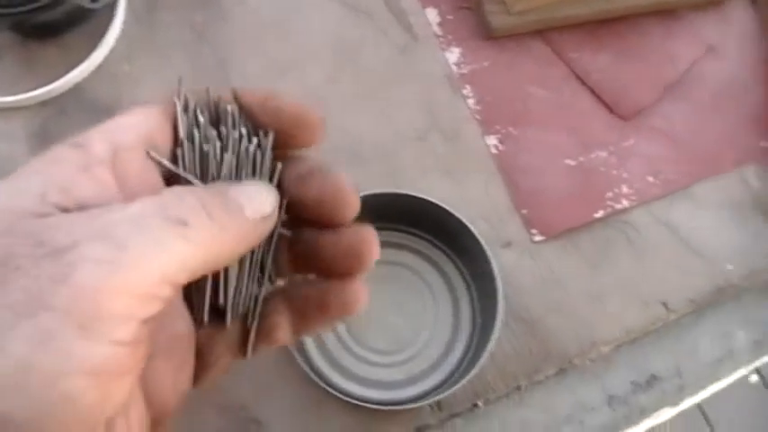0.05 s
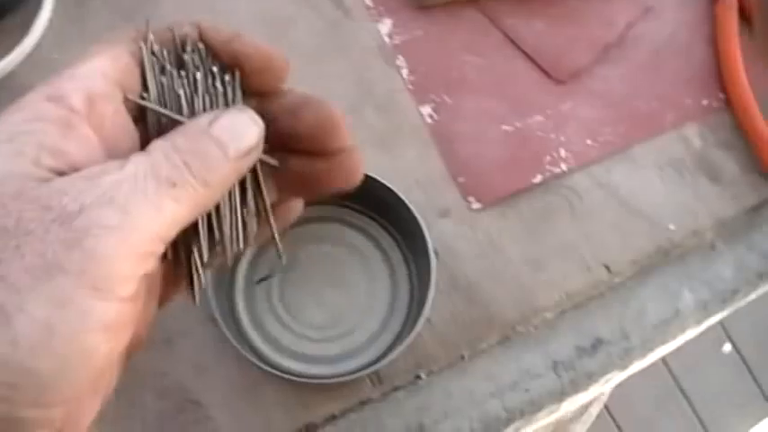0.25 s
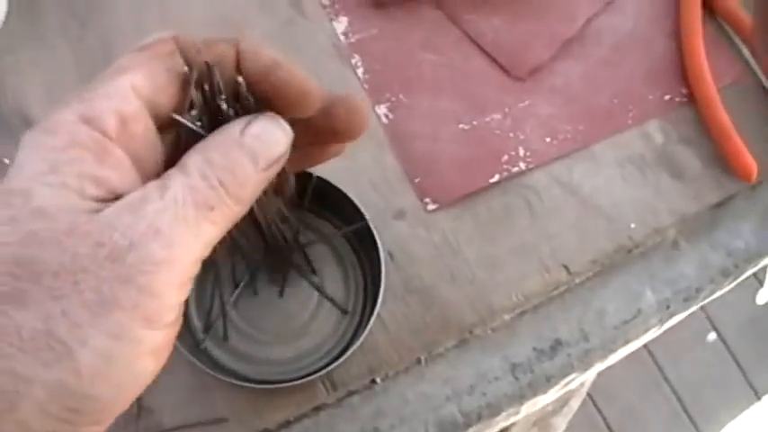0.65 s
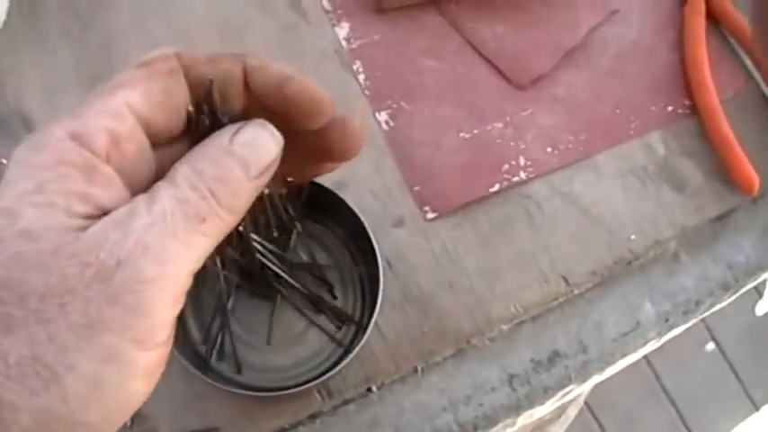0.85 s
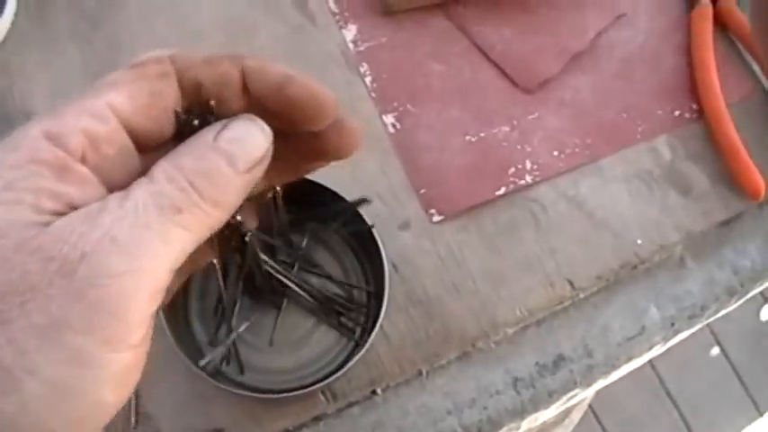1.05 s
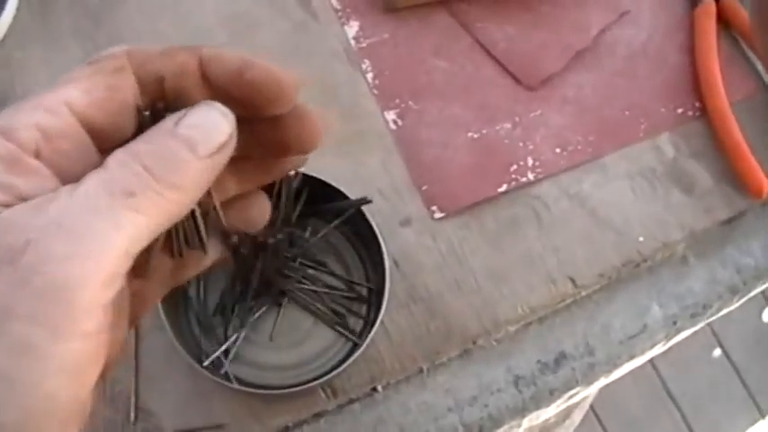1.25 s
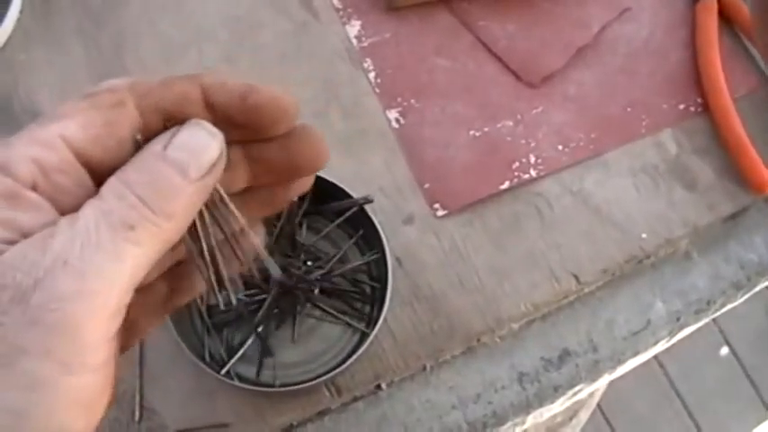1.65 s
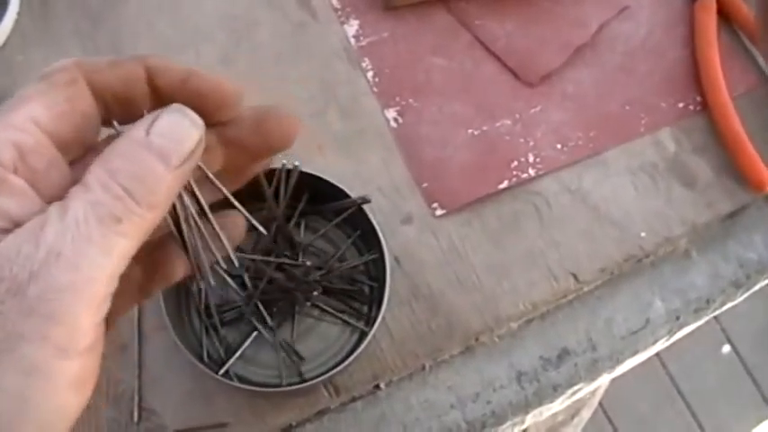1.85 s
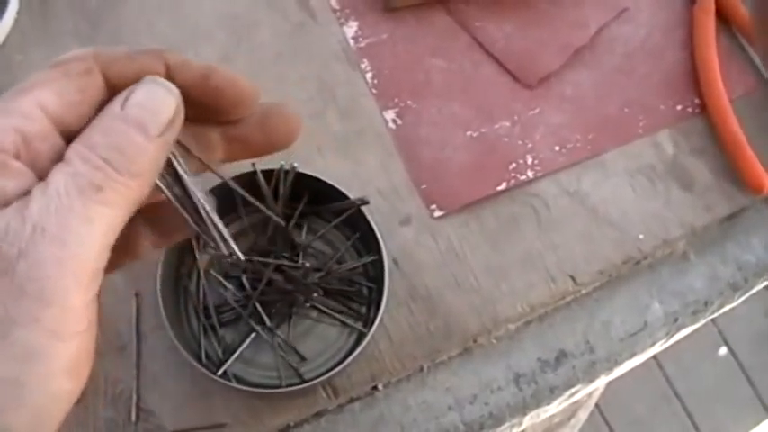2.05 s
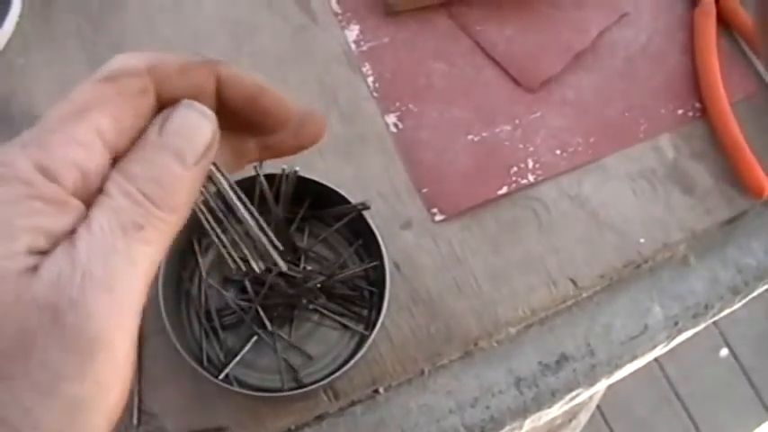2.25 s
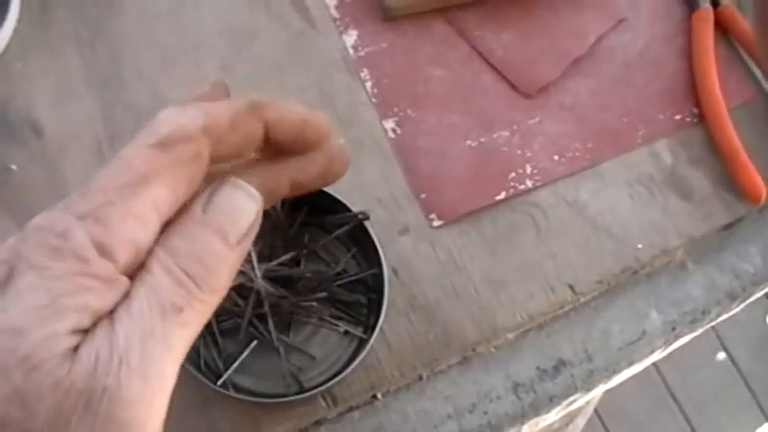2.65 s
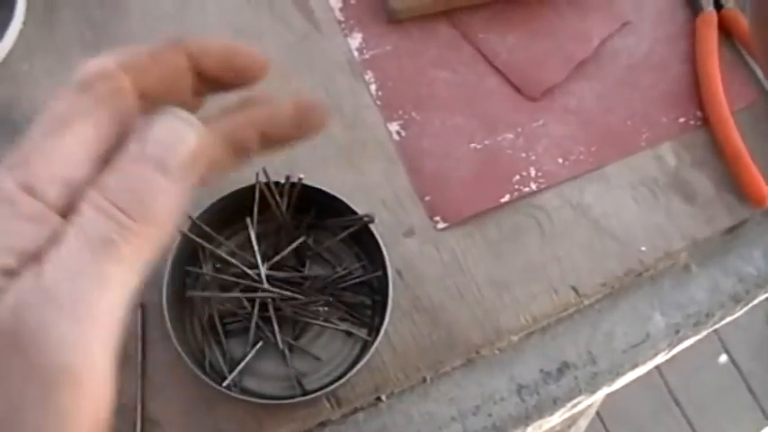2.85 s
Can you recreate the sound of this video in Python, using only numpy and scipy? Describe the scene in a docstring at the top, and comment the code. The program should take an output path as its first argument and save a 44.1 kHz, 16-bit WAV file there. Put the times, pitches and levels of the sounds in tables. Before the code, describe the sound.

Wire pieces clatter into a metal can, the bright clinks dulling as it fills.

```python
"""Outdoors, a far bird whistles over a low murmur of air while short iron wires shift in a hand.
From a quarter of a second they drop, a few at a time, into a shallow tin can on a wooden bench.
Each impact excites the modes of wire and can; heavy ones also thud the bench, and the loudest overload
the close microphone. The growing pile damps the can, so its clear ring gives way to a dry clatter.
The last wires settle, and near three seconds the bird calls again."""
import sys
import numpy as np
from scipy import signal
from scipy.fft import rfft, irfft
from scipy.io import wavfile
from scipy.ndimage import uniform_filter1d

SR = 44100
rng = np.random.default_rng(int(sys.argv[2]) if len(sys.argv) > 2 else 0)


def inscribe(sig):
    """Save sig as 16-bit PCM at rate SR to the path in sys.argv[1].

    A 1-D sig is mono; a 2-D sig holds one channel per row.
    Samples are clipped to [-1, 1] before scaling.
    """
    pcm = np.round(np.clip(np.atleast_2d(sig).T, -1, 1) * 32767)
    wavfile.write(sys.argv[1], SR, pcm.astype(np.int16))


N = 132300
OPPOSED = np.array([[1], [-1]])  # opposite signs in the left and right channels


def from_db(db):
    """Amplitude grows tenfold for every 20 dB."""
    return 10 ** (np.asarray(db) / 20)


def rms_one(x):
    """Normalisation: the signal is scaled to unit mean power."""
    return x / np.sqrt(np.mean(x ** 2) + 1e-20)


def level_at(spectrum, hz):
    """A spectral envelope is interpolated in dB against log frequency."""
    points_hz, db = np.transpose(spectrum)
    return np.interp(np.log(hz), np.log(points_hz), db)


def highpass(x, hz, order=2):
    """A Butterworth filter attenuates what lies below its cutoff."""
    return signal.sosfilt(signal.butter(order, hz, "high", fs=SR, output="sos"), x)


def ring(times, heights, hz, t60):
    """A mode is a damped oscillator: each impulse starts a decaying sinusoid."""
    impulses = np.bincount(np.clip((times * SR).astype(int), 0, N - 1), heights, N)
    radius = from_db(-60 / (t60 * SR))
    angle = 2 * np.pi * min(hz, SR / 2.2) / SR
    return signal.lfilter([0, np.sin(angle)], [1, -2 * radius * np.cos(angle), radius ** 2], impulses + 1e-18)


def coupling(times, spread_db):
    """Mode shape: each point of contact meets a mode with its own sign and strength."""
    sign, strength = rng.standard_normal((len(times), 2)).T
    return np.sign(sign) * from_db(spread_db * strength)


def placed(x, spread_db=1):
    """Directivity: each mode radiates a little more to one side."""
    return x * from_db(spread_db * rng.normal() * OPPOSED)


def force(levels, hz, body_hz=2200, treble_hz=10000):
    """An impact's spectrum is flat up to body_hz, then slopes through its treble level at treble_hz."""
    body, treble = levels
    share = np.clip(np.log(hz / body_hz) / np.log(treble_hz / body_hz), 0, 1.2)
    return from_db(body + share * (treble - body))


# Spectrum of the air. Each row: frequency in Hz, relative density in dB.
AIR_SPECTRUM = [(25, -7), (120, -2), (220, -2.5), (500, -12.5), (680, -6.5), (1100, -16), (3000, -19),
                (6500, -32), (15000, -42)]
# The background sinks under the loudest clatter. Each row: time in seconds, level in dB.
AIR_LEVEL = [(0.24, -42.5), (0.4, -55), (0.9, -61), (1.2, -54.5), (1.38, -46), (3.0, -46.5)]
def air(side_db=-14):
    """Coloured noise, mostly low and largely common to both channels, gives the outdoor murmur."""
    colour = from_db(level_at(AIR_SPECTRUM, np.arange(N // 2 + 1) * SR / N + 1))
    white = rng.standard_normal((2, N))
    mid, side = rms_one(irfft(rfft(white) * colour, N))
    level = from_db(np.interp(np.arange(N) / SR, *np.transpose(AIR_LEVEL)))
    return level * (mid + from_db(side_db) * side * OPPOSED)


# The far bird's whistles. Each row: start in seconds, level in dB.
BIRD_CALLS = [(0.0, -42.5), (2.954, -44.5)]
def bird(start_hz=4400, fall_hz_per_s=13000, length_s=.13, waver_hz=300):
    """Frequency modulation: a pure tone glides down and wavers at random."""
    out = 0
    for start, db in BIRD_CALLS:
        age = np.clip(np.arange(N) / SR - start, 0, length_s)
        waver = rms_one(uniform_filter1d(rng.standard_normal(N), size=60))
        hz = start_hz - fall_hz_per_s * age + waver_hz * waver
        envelope = from_db(db) * np.sqrt(np.abs(np.sin(np.pi * age / length_s)))
        out = out + envelope * np.sin(2 * np.pi * np.cumsum(hz) / SR)
    return out


# Wires shifting in the hand. Each row: centre in seconds, half length in seconds, level in dB.
HAND_RUBS = [(0.037, 0.0069, -36), (0.12, 0.0096, -39.5)]
def hand():
    """Friction: the bundle scrapes between the fingers in faint bursts of bright noise."""
    t = np.arange(N) / SR
    grit = rms_one(highpass(rng.laplace(size=N), 2500))
    return grit * sum(from_db(db) * np.exp(-((t - centre) / width) ** 2) for centre, width, db in HAND_RUBS)


# Heavy hits. Each row: time in seconds, then levels in dB of the can's bottom, of the bench
# and of a low thump, opposite in left and right.
HEAVY_LANDINGS = [(0.2470, -3.5, -25, -16), (0.4440, -6, -38, -50), (0.6249, -10.5, -33, -50),
                  (1.4680, -19, -39, -35), (1.52, -16, -51, -43), (2.1792, -12.5, -29, -36)]
# Modes of the can's bottom, and the low modes of thud and thump.
# Each row: frequency in Hz, gain in dB, T60 in seconds.
BOTTOM_MODES = [(1497, -8.5, 0.047), (1486, 0.5, 0.022)]
LOW_MODES = [(138, -8.5, 0.028), (270, 8.5, 0.016)]
def heavy_landings(thump_lag_s=0.0015):
    """Resonance: the can's bottom clanks and the bench thuds. A low thump is also heard, in antiphase."""
    def strike(times, levels, modes):
        return sum(ring(times, from_db(levels + db), hz, t60) for hz, db, t60 in modes)

    times, bottom_db, bench_db, thump_db = np.transpose(HEAVY_LANDINGS)
    clank = strike(times, bottom_db, BOTTOM_MODES)
    thud = strike(times, bench_db, LOW_MODES)
    thump = strike(times + thump_lag_s, thump_db, LOW_MODES)
    return placed(clank) + thud + thump * OPPOSED


# Modes of the can's wall and loaded bottom. Each row: frequency in Hz, gain in dB, T60 in seconds.
WALL_MODES = [(991, -9, .12), (1690, -10, .14), (2138, -4.5, .22), (2863, 1, .2), (4355, -10, .17),
              (5580, -3.5, .15), (5827, -9, .12), (6451, -3, .18), (7765, -4, .14), (9300, -8, .08),
              (10840, -9, .1), (11462, -12, .13), (12504, -10, .1)]
LOADED_MODES = [(620, -7, .08), (1330, 0, .06), (3640, -3, .09), (4640, -1, .09), (6614, -3, .1),
                (7418, -3, .1), (9749, -6, .08)]
# Ring left in each as the pile grows. Each row: time in seconds, gain in dB.
WALL_DAMPING = [(0.24, -2), (0.48, -8), (0.66, -13.5), (1.0, -20)]
LOADED_DAMPING = [(0.3, -13), (0.8, -11), (1.1, -20)]
SMOTHERED_S = 1.5  # from here on the pile covers the bottom
def can(times, levels):
    """Shell resonance: the wall rings first, the loaded bottom soon after; the pile smothers both."""
    out = 0
    for modes, damping in ((WALL_MODES, WALL_DAMPING), (LOADED_MODES, LOADED_DAMPING)):
        can_ring = (times > damping[0][0]) & (times < SMOTHERED_S)
        ring_left = from_db(np.interp(times, *np.transpose(damping))) * can_ring
        for hz, db, t60 in modes:
            heights = ring_left * from_db(db) * force(levels, hz) * coupling(times, spread_db=0)
            out = out + placed(ring(times, heights, hz, t60))
    return out


# Bending modes of a free rod. Each row: ratio to the lowest frequency, gain in dB.
ROD_MODES = [(1, -13), (2.74, -11.5), (5.35, -8.5)]
# High ring of the loose wires. Each entry: frequency in Hz.
TINKLE_HZ = [12950, 13450, 13660]
def wires(times, levels, count=18, middle_hz=2357, log_spread=0.096, tinkle_db=-31):
    """Bending vibration: each contact rings one wire, pitched by its length, and adds a high tinkle."""
    out = 0
    struck_wire = rng.integers(0, count, N)[(times * SR).astype(int)]
    for wire, pitch in enumerate(middle_hz * np.exp(log_spread * np.linspace(-2, 2, count))):
        for ratio, db in ROD_MODES:
            hz = pitch * ratio
            heights = (struck_wire == wire) * from_db(db) * force(levels, hz)
            out = out + placed(ring(times, heights, hz, t60=0.032))
    for hz in TINKLE_HZ:
        heights = from_db(tinkle_db) * force(levels, hz) * coupling(times, spread_db=7)
        out = out + placed(ring(times, heights, hz, t60=.11))
    return out


# Wires that bounce clear. Each row: start in seconds, lowest mode's frequency in Hz, its level in dB.
FREE_WIRES = [(1.468, 1532, -11), (1.52, 2286, -17.5), (1.834, 2230, -19.5), (2.025, 3230, -17.5),
              (2.179, 1950, -12.5), (2.712, 2080, -17)]
def free_wires(t60=.05):
    """Free vibration: a wire clear of the pile rings in two bending modes, the higher dying sooner."""
    out = 0
    for start, pitch, level in FREE_WIRES:
        for ratio, db in ROD_MODES[:2]:
            height = from_db([level + db - ROD_MODES[0][1]])
            out = out + placed(ring(np.array([start]), height, pitch * ratio, t60 / ratio))
    return out


def both_ends(times, levels, longest_lag_s=.003, far_end_db=-6.5):
    """Double impact: a wire's other end touches down a moment later and more weakly."""
    lag = longest_lag_s * rng.uniform(.5, 1, N)[(times * SR).astype(int)]
    return np.r_[times, times + lag], [np.r_[db, db + far_end_db] for db in levels]


# Spectrum of the damped can and pile. Each row: frequency in Hz, relative density in dB.
PILE_SPECTRUM = [(350, -75), (600, -12), (940, -6), (1090, -7.5), (1690, -2), (2040, 2.5), (2790, -5.5),
                 (3110, -1.5), (4030, -8.5), (5740, -6), (6950, -8.5), (9370, -8.5), (11200, -17),
                 (12800, -10.5), (15500, -22.5)]
RADIATION_HZ = 628  # the can is too small to radiate well below this
def pile(times, levels, count=150, gain_db=6.5, bare_db=-1.5, ripple_db=4, ripple_hz=2586):
    """Modal overlap: the crowded, quickly dying modes of the loaded can merge into a dry crack."""
    root_hz = np.linspace(np.sqrt(560), np.sqrt(16000), count) + rng.uniform(-.2, .2, count)
    pitches = root_hz ** 2
    gains = from_db(level_at(PILE_SPECTRUM, pitches)) * np.sqrt(root_hz)  # sparser modes carry more each
    gains = from_db(gain_db) * gains / np.linalg.norm(gains)
    point, offset = rng.random((N, 2))[(times * SR).astype(int) % N].T
    heaped = from_db(bare_db * np.clip(1 - times / SMOTHERED_S, 0, 1))  # weaker until a pile has formed
    out = 0
    for hz, gain in zip(pitches, gains):
        # The point of contact favours some modes over others.
        ripple = from_db(ripple_db * np.cos(2 * np.pi * (hz / ripple_hz * (.5 + point) + offset)))
        heights = heaped * gain * ripple * force(levels, hz) * coupling(times, spread_db=2)
        out = out + placed(ring(times, heights, hz, t60=.028))
    mode_gap = signal.iirnotch(4043, Q=30.4, fs=SR)  # the can has no modes here
    return signal.lfilter(*mode_gap, highpass(out, RADIATION_HZ, order=5))


# Wires landing. Each row: time in seconds, relative body level in dB, relative treble level in dB.
STRIKES = [(0.248, -6, -12.5), (0.2938, -39, -20), (0.3119, -34, -14), (0.336, -8, -10.5),
           (0.3405, -8.5, -12), (0.3499, -19, -17), (0.407, -12, -10.5), (0.4277, -12.5, -24.0),
           (0.4441, -5, -9.5), (0.4677, -12, -13.5), (0.476, -15, -20), (0.5046, -11, -24),
           (0.5175, -11, -14), (0.5593, -15.5, -16.5), (0.5897, -17, -28), (0.625, -0.5, -11.5),
           (0.6321, -9, -21), (0.6408, -17, -21), (0.6543, -7.5, -16.5), (0.8029, -11, -12.5),
           (0.8461, -10.5, -16), (0.863, -20, -17), (0.8696, -12.5, -11.5), (0.9038, -9.5, -13),
           (0.9354, -20.5, -16.5), (0.9549, -14.5, -24), (0.9679, -8, -15.5), (0.9848, -12.5, -28),
           (1.0159, -16.5, -21), (1.026, -13.5, -17), (1.0392, -17.5, -20), (1.1016, -16.5, -9),
           (1.131, -14, -25), (1.1461, -13, -10), (1.175, -5, -12.5), (1.2006, -19, -18),
           (1.243, -24.5, -22), (1.25, -20, -18.5), (1.3326, -20, -21), (1.345, -19.5, -17.5),
           (1.3827, -20, -19), (1.468, -4.5, -9), (1.4711, -8, -11), (1.5199, -6, -15.0),
           (1.5759, -18, -33), (1.676, -16, -21), (1.7135, -13, -23.5), (1.7424, -20, -17.5),
           (1.8346, -17.5, -24), (1.86, -32.5, -24.5), (1.9425, -24.5, -36.5), (2.0016, -22, -57),
           (2.0257, -9.5, -15.0), (2.035, -18, -15.5), (2.1125, -14.5, -7), (2.1405, -32, -25),
           (2.1794, -5, -10.5), (2.3268, -26.5, -30), (2.373, -16.5, -13), (2.3496, -28.5, -43),
           (2.3486, -32, -41), (2.419, -24, -23), (2.4523, -4.5, -7), (2.4726, -7.5, -11),
           (2.4783, -12, -13.5), (2.4968, -19, -31), (2.514, -13.5, -38), (2.5231, -13.5, -19),
           (2.538, -19.5, -16.5), (2.576, -25.5, -25.5), (2.5935, -16, -17.5), (2.6133, -15, -23),
           (2.6332, -36.5, -12), (2.6695, -29, -22), (2.7113, -17.5, -23), (2.7365, -23.5, -25),
           (2.7961, -24, -28)]
# Wires jostling between strikes. Each row: time in seconds, relative level in dB.
JOSTLING = [(0.29, -31), (0.33, -11.5), (0.38, -22.5), (0.53, -15), (0.59, -26), (0.612, -46),
            (0.64, -14.5), (0.78, -16.5), (0.89, -23), (1.0, -22.5), (1.1, -26.5), (1.45, -22.5),
            (1.55, -30.5), (1.65, -37), (1.69, -26), (1.84, -33.5), (1.9, -47.5), (1.97, -45.5), (2.2, -25),
            (2.25, -54), (2.44, -45), (2.47, -19.5), (2.55, -22), (2.7, -33.5), (2.82, -35), (2.85, -52.5)]
def contacts(jostles_per_s=480, spread_db=4.5):
    """Impulsive excitation: strikes and a Poisson stream of jostles give times and levels in dB."""
    strike_times, strike_body, strike_treble = np.transpose(STRIKES)
    jostle_times = np.flatnonzero(rng.random(N) < jostles_per_s / SR) / SR
    size = np.clip(rng.standard_normal(N), -2, 2)[(jostle_times * SR).astype(int)]
    jostle_db = np.interp(jostle_times, *np.transpose(JOSTLING), left=-90, right=-90) + spread_db * size
    body_db = np.r_[strike_body - 4.5, jostle_db - 11.5]
    treble_db = np.r_[strike_treble + 0.5, jostle_db - 11]
    return np.r_[strike_times, jostle_times], (body_db, treble_db)


def echoes(x, gain_db=-15, t60=0.11, delay_s=0.0037):
    """Diffuse reflection from hand, bench and nearby walls adds a short, exponentially decaying tail."""
    t = np.arange(SR // 2) / SR
    tail = rng.standard_normal((2, len(t))) * from_db(-60 * t / t60) * (t > delay_s)
    return from_db(gain_db) * signal.fftconvolve(x, tail / np.linalg.norm(tail[0]), axes=1)[:, :N]


def scene():
    """Superposition: wires, can and bench add to their reflections and the quiet surroundings."""
    times, levels = contacts()
    ringing = highpass(wires(times, levels) + free_wires() + can(times, levels), RADIATION_HZ)
    clatter = pile(*both_ends(times, levels))
    impacts = clatter + ringing + heavy_landings()
    return impacts + echoes(impacts) + hand() + bird() + air()


def record(dry):
    """Saturation flattens the loudest peaks; band limiting then cuts the deep bass and the top."""
    ceiling, low_hz, high_hz = 0.69, 78, 16300
    clipped = dry / (1 + (dry / ceiling) ** 8) ** .125
    steep_lowpass = signal.ellip(12, .1, 80, high_hz, fs=SR, output="sos")
    return signal.sosfilt(steep_lowpass, highpass(clipped, low_hz))


dry = scene()
out = record(dry)
inscribe(out)
```